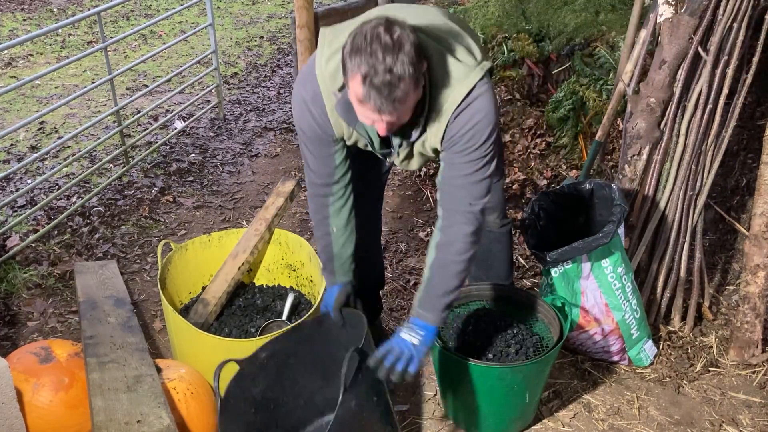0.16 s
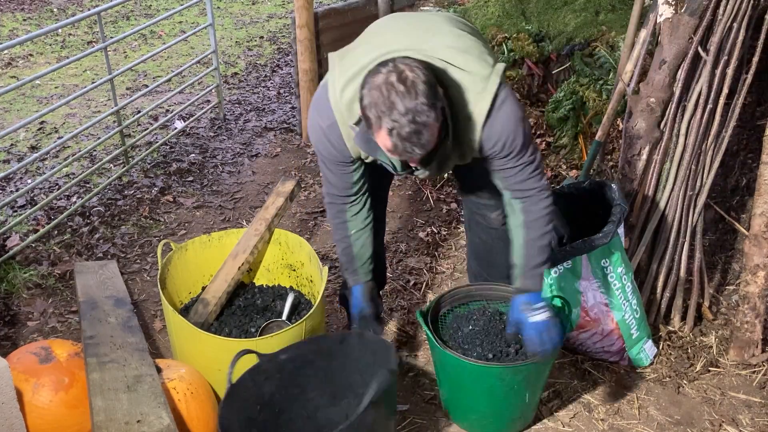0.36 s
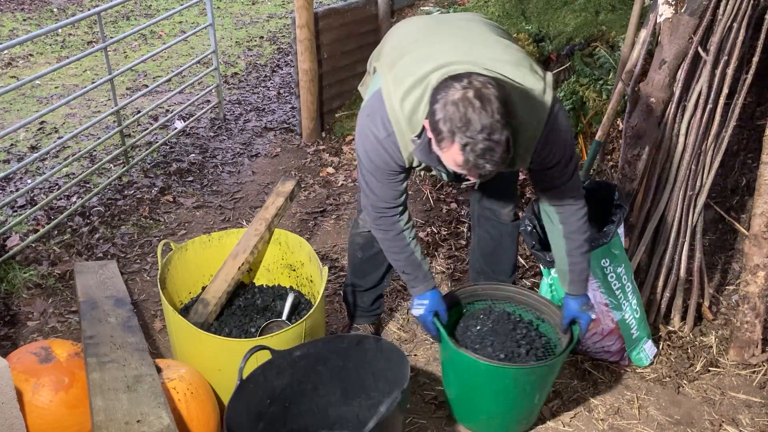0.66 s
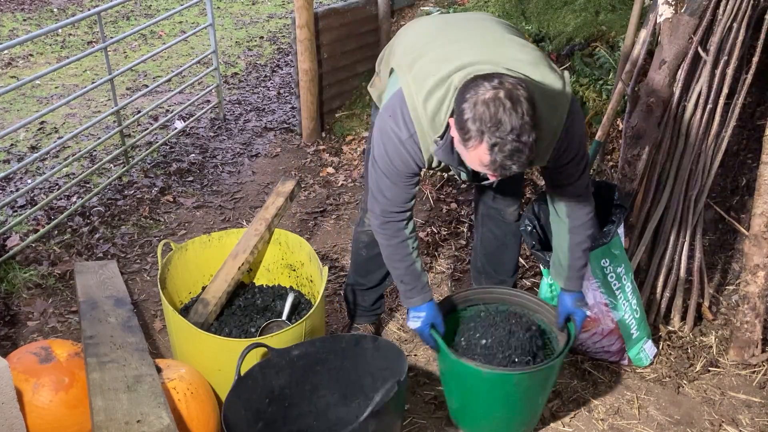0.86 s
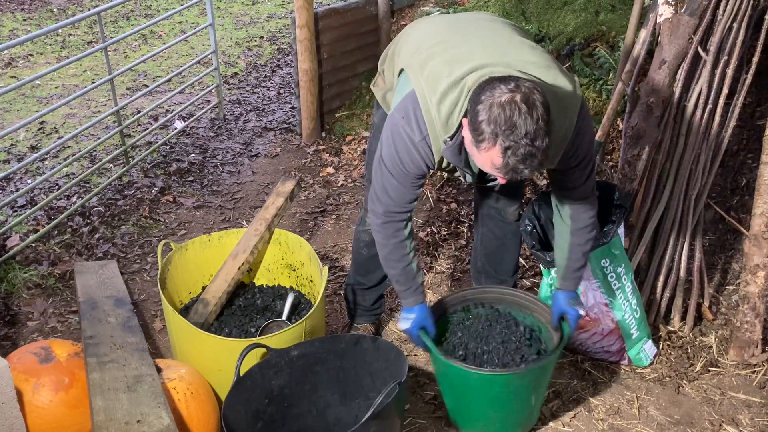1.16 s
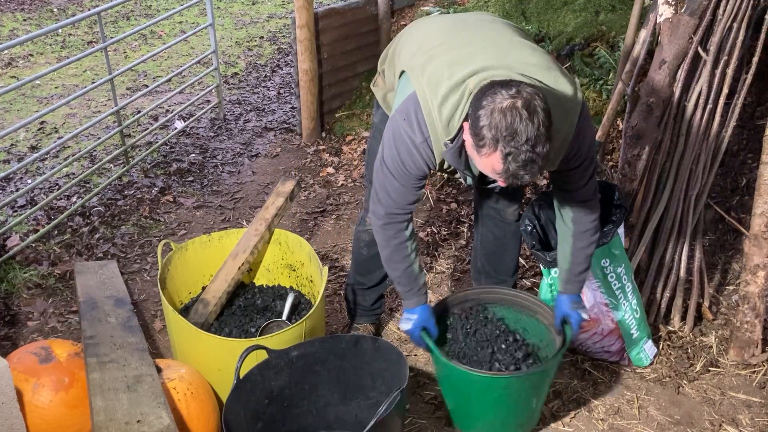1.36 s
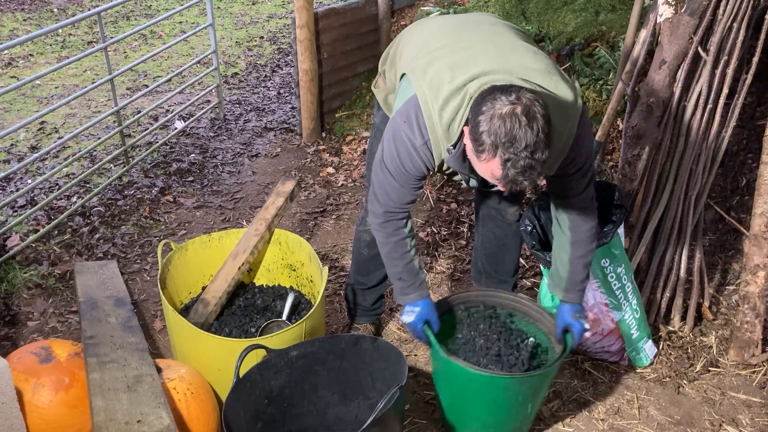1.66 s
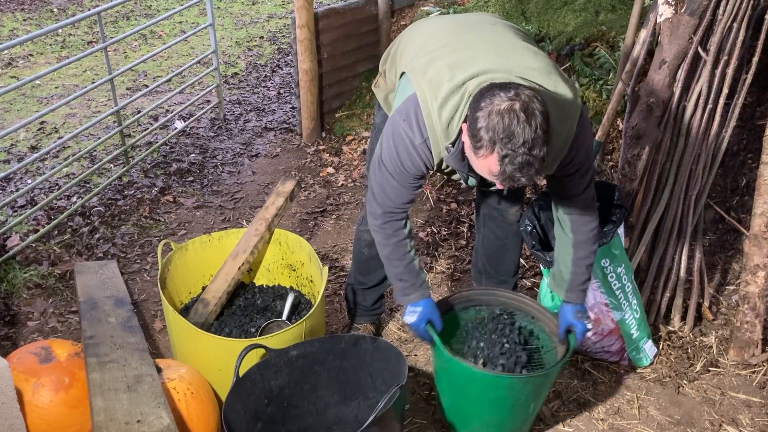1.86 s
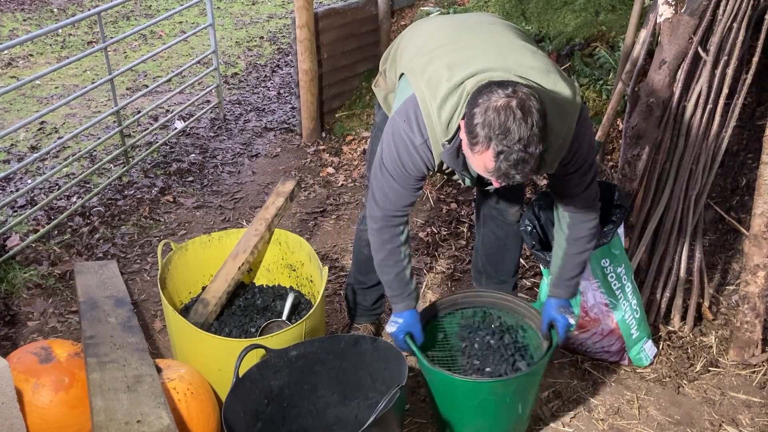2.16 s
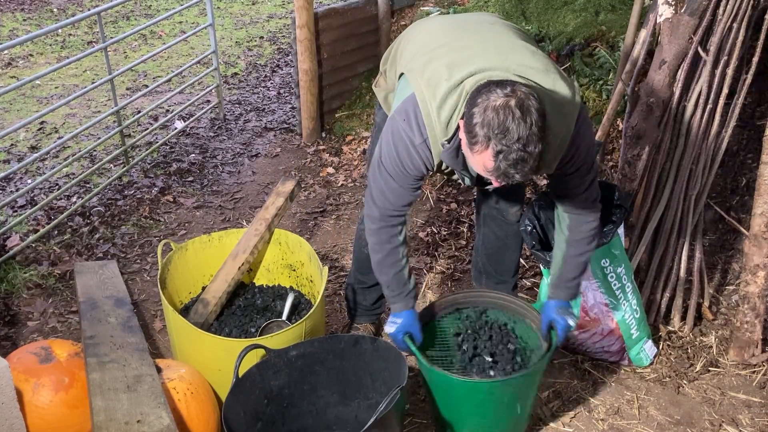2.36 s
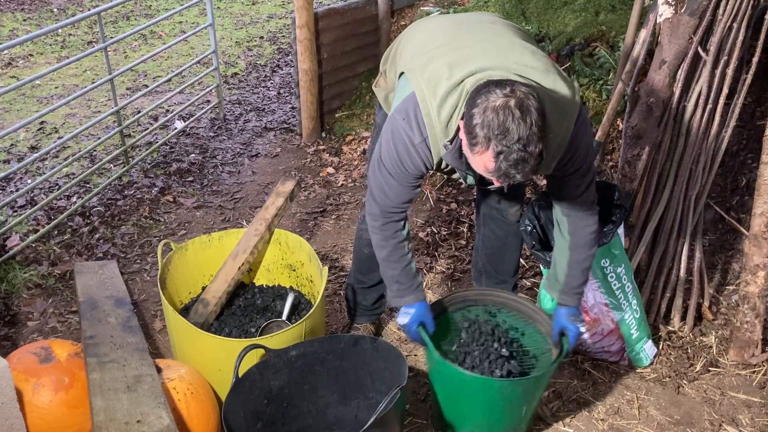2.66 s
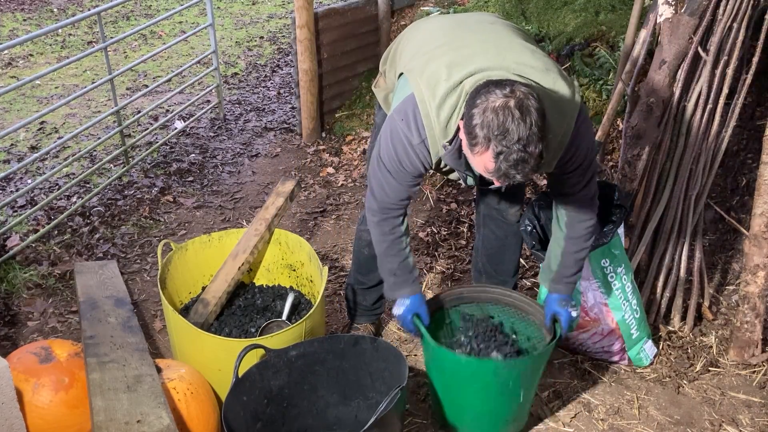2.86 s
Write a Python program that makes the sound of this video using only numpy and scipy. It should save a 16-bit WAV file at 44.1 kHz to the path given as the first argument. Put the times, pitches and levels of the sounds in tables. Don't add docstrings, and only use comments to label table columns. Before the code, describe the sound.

Charcoal sieving outdoors, heard close up: first an empty plastic tub cracks down and scuffs to rest, then fast, regular shakes rattle lumps over mesh, thump the bucket and send fines hissing through.

```python
import sys
import numpy as np
from scipy import signal
from scipy.fft import rfft, irfft, next_fast_len
from scipy.io import wavfile
from scipy.ndimage import uniform_filter1d, map_coordinates

SR = 44100
rng = np.random.default_rng(int(sys.argv[2]) if len(sys.argv) > 2 else 0)


def rack_gain(trim_db):
    fader = np.asarray(trim_db, float)
    return 10 ** (fader / 20)


def generate_wav(signal):
    frames = np.transpose(np.atleast_2d(signal))
    scaled = np.clip(frames, -1, 1) * 32767
    pcm = np.round(scaled).astype(np.int16)
    wavfile.write(sys.argv[1], SR, pcm)


N = 132300


def unit(x):
    return x / np.sqrt(np.mean(x ** 2) + 1e-20)


def noise():
    return rng.standard_normal(N)


def filtered(x, response):
    m = next_fast_len(N + SR // 2)
    return irfft(rfft(x, m) * response(np.fft.rfftfreq(m, 1 / SR)), m)[:N]


def coloured(x, points):
    f, v = np.transpose(points)
    return unit(filtered(x, lambda hz: rack_gain(np.interp(np.log(hz + 1), np.log(f + 1), v))))


def wobble(rate):
    return map_coordinates(rng.standard_normal(400), [np.arange(N) * rate / SR])


def swells(rows, axis, rise=0.89, shape=1.4):
    power, t = np.zeros(N), np.arange(N) / SR
    for row in rows:
        centre, length = row[:2]
        near = slice(max(0, int((centre - 2 * length) * SR)), int((centre + 2 * length) * SR))
        u = 2 * (t[near] - centre) / length
        power[near] += rack_gain(2 * row[axis]) * np.exp(-np.abs(np.where(u < 0, u / rise, u)) ** shape)
    return np.sqrt(power)


def grains(count, lo_hz, hi_hz, cycles, spread_db, size):
    u = rng.random((count, 4))
    hz, k = lo_hz + (hi_hz - lo_hz) * u[:, 1:2], np.arange(size)
    gain = rack_gain(-spread_db * np.log(u[:, 2:3] + 1 / 100)) * np.sqrt(hz)
    life = hz * k / SR / (cycles * (.5 + u[:, 3:]))
    wave = gain * np.sin(2 * np.pi * hz * k / SR) * np.sqrt(life) * np.exp(-life)
    places = (u[:, :1] * N).astype(int) + k
    return unit(np.bincount(places.ravel(), wave.ravel(), N + size)[:N])


def ring(s, modes, sag=0):
    attack_s, sag_s = .0003, 0.077
    out, start = np.zeros(N), int(s * SR)
    t = np.arange(min(N - start, int(max(m[2] for m in modes) * SR))) / SR
    bent = t + sag * sag_s * (1 - np.exp(-t / sag_s))
    tone = sum(rack_gain(db - 60 * t / t60) * np.sin(2 * np.pi * hz * bent) for hz, db, t60 in modes)
    out[start:][:len(t)] = (1 - np.exp(-t / attack_s)) * tone
    return out


# (time [s], peak level [dB], bucket note [Hz], thud level [dB])
KNOCKS = [(0.8023, -19, 217, -12), (0.8826, -19.5, 231, -42), (0.9851, -17.5, 246, -17),
          (1.0939, -13, 244, -36), (1.1862, -15.5, 218, -11.5), (1.289, -20.5, 228.4, -48),
          (1.3844, -19.5, 238, -21.5), (1.477, -18, 219.4, -37), (1.603, -21, 212, -14.5),
          (1.6659, -15, 238.3, -27.5), (1.788, -14, 252.3, -15), (1.8591, -19, 228, -30),
          (1.976, -13, 258, -13.5), (2.0682, -18, 230, -34), (2.1779, -12, 257.4, -10),
          (2.261, -16, 242.3, -30), (2.3783, -16, 240.4, -13), (2.465, -15.5, 252, -29),
          (2.5813, -14, 257, -16), (2.664, -16, 227, -23), (2.7788, -13, 237.3, -9),
          (2.8715, -15.5, 253, -43)]
# (time [s], peak level [dB], thud level [dB])
REBOUNDS = [
    (0.9103, -24.5, -34),
    (1.1103, -20.5, -34),
    (1.3009, -18, -14.5),
    (1.4874, -20, -16),
    (1.676, -18, -13),
    (1.871, -22, -22),
    (2.076, -13.5, -31),
    (2.477, -15.5, -29),
    (2.8837, -21.5, -17),
]
# (multiple of its note, level [dB], t60 [s])
BUCKET_MODES = [(1, 0, 0.1), (2.3, -6.5, 0.017), (2.9, -18, 0.15), (3.5, -31, 0.056)]
# (frequency [Hz], density [dB per Hz])
CHATTER = [(60, -48), (150, 8.5), (245, 3.5), (300, 2.5), (380, -67), (2500, -97)]
# (frequency [Hz], density [dB per Hz])
RIM_SLAP = [(250, -12), (550, 2), (1100, -8), (1800, -29.5), (4000, -53)]


def bucket():
    hits = KNOCKS + [(s, db, 238, thud_db) for s, db, thud_db in REBOUNDS]
    ringing, blows = np.zeros(N), np.zeros(N)
    vary = rng.standard_normal((len(hits), 2, len(BUCKET_MODES)))
    vary = vary * (np.arange(len(BUCKET_MODES)) > 0)
    for (s, db, note_hz, thud_db), (detune, uneven) in zip(hits, vary):
        modes = [(note_hz * k * (1 + 0.076 * d), db - 1 + level + 0.68 * e, t60)
                 for (k, level, t60), d, e in zip(BUCKET_MODES, detune, uneven)]
        thud = (111, thud_db + 1.5, 0.036)
        ringing += ring(s, modes + [thud])
        blows[int(s * SR)] = rack_gain(db)

    t = np.arange(SR // 4) / SR
    contact_s = .0007
    rap = signal.fftconvolve(blows, rack_gain(-5) * np.hanning(int(contact_s * SR) + 2))[:N]
    slap = signal.fftconvolve(blows, rack_gain(-9.5 - 60 * t / .025))[:N] * coloured(noise(), RIM_SLAP)
    shake = signal.fftconvolve(blows, (1 - np.exp(-t / 0.0062)) * rack_gain(-4 - 60 * t / 0.069))[:N]
    chatter = shake * coloured(noise(), CHATTER)
    return ringing + rap + slap + chatter + stroke_air()


def stroke_air():
    sway_hz, wide_hz, lag_s, uneven = 8.4, 4.6, 0.017, 0.34
    push = np.zeros(N)
    push[[int((r[0] + lag_s) * SR) for r in KNOCKS]] = -1 - uneven * (-1) ** np.arange(len(KNOCKS))
    sway = filtered(push, lambda f: 1j * f / (sway_hz ** 2 - f * f + 1j * f * wide_hz) / (1 + (f / 18) ** 2))
    return rack_gain(-31) * unit(sway)


# (centre [s], length [s], clink level [dB], clunk level [dB])
SLIDES = [(.77, 0.055, -47.5, -66), (.815, 0.021, -34, -28), (.85, 0.0069, -52, -62),
          (.9, 0.064, -35.5, -37), (1.0, 0.058, -35.5, -30.5), (1.055, 0.07, -64, -50),
          (1.127, 0.11, -32, -32), (1.2, 0.014, -33, -31), (1.3, 0.077, -33, -28.5),
          (1.398, 0.061, -35.5, -31), (1.5, 0.041, -30, -27), (1.606, 0.072, -30, -31),
          (1.697, 0.033, -33, -40.5), (1.8, 0.067, -32, -33.5), (1.884, 0.028, -32.5, -34),
          (1.965, 0.14, -34.5, -42), (2.11, 0.038, -29, -35.5), (2.17, 0.077, -37, -35.5),
          (2.285, 0.045, -29, -32), (2.39, 0.05, -29.5, -36.5), (2.492, 0.039, -28, -32),
          (2.596, 0.039, -27.5, -33), (2.69, 0.056, -32, -33), (2.797, 0.044, -31, -31),
          (2.888, 0.034, -31.5, -33), (2.99, 0.051, -35, -35)]
# (time [s], peak level [dB])
SLAMS = [(0.8063, -34), (0.8338, -21.5), (0.8692, -31), (0.8971, -41), (0.961, -21.5), (1.1969, -20),
         (1.2383, -24), (1.3511, -17), (1.3576, -17), (1.395, -19), (1.4429, -25), (1.4838, -30),
         (1.564, -20), (1.5885, -31), (1.6893, -29), (1.7497, -20), (1.7721, -28.5), (1.856, -19),
         (1.8784, -24), (1.947, -22.5), (2.0764, -15), (2.1637, -18), (2.2435, -33), (2.2565, -26.5),
         (2.2735, -27), (2.3593, -18.5), (2.4568, -19.5), (2.4825, -26), (2.5399, -21), (2.5693, -15),
         (2.6626, -39), (2.6811, -22), (2.6816, -15), (2.855, -18), (2.8821, -22), (2.971, -36)]
# (time [s], level [dB])
TRICKLE = [
    (.72, -71),
    (.82, -55),
    (1.1, -38),
    (1.7, -43.5),
    (2.3, -39.5),
    (3, -40),
]
# (frequency [Hz], density [dB per Hz])
CLINK = [(760, -2.5), (1550, 3.5), (1930, -2.5), (4510, 3), (7290, -4), (8350, -12), (13200, -14.5),
         (14000, -22), (15800, -21)]
# (frequency [Hz], density [dB per Hz])
CLUNK = [(120, 2), (220, 21.5), (330, 8), (409, 1.5), (653, 7.5), (883, 6), (1120, -7.5), (1550, -14.5),
         (1910, -7), (2200, -7), (2860, -104)]
# (frequency [Hz], width [Hz], lift [dB])
MESH = [(2547, 35, 6.5), (4300, 65, 6), (10500, 1630, 6.5), (12850, 510, 7)]


def mesh_lift(f):
    return 1 + sum((rack_gain(db) - 1) * 1j * f * w / (c * c - f * f + 1j * f * w) for c, w, db in MESH)


def charcoal():
    t = np.arange(N) / SR
    lumps = grains(28000, 1200, 16000, cycles=4, spread_db=2, size=140) + .6 * noise()
    clink = coloured(filtered(lumps, mesh_lift), CLINK)
    clunk = coloured(grains(3500, 330, 1800, cycles=2.2, spread_db=2.5, size=500) + .6 * noise(), CLUNK)
    fines = coloured(grains(16000, 1200, 16000, cycles=3.5, spread_db=2, size=120) + .6 * noise(), CLINK)

    s, db = np.transpose(TRICKLE)
    flow = rack_gain(np.interp(t, s, db))
    jostle = rack_gain(1.1 * wobble(50))
    rise_s, slam_db, slam_t60 = .0015, -11, 0.071
    slam_power = sum(np.clip((t - s) / rise_s, 0, 1) * rack_gain(2 * (db + slam_db - 60 * np.abs(t - s) / slam_t60))
                     for s, db in SLAMS)
    slide_power = swells(SLIDES, axis=2, rise=0.83, shape=2.13) ** 2 * rack_gain(-1.5)
    clink_gain = np.sqrt(slide_power + slam_power)
    clunk_gain = swells(SLIDES, axis=3, rise=0.52, shape=1.39) + 0.44 * flow
    return jostle * (clink_gain * clink + clunk_gain * clunk) + flow * fines


# (centre [s], length [s], frequency [Hz], level [dB])
RATTLES = [
    (1, .05, 747, -36.5),
    (1.009, 0.06, 1630, -38.5),
    (1.05, .08, 830, -44),
    (1.093, 0.061, 830, -35),
    (1.157, 0.049, 880, -39),
]


def rattle():
    width = .22
    knocks = grains(6000, 500, 2000, cycles=1.5, spread_db=2, size=200)

    def band(c):
        return unit(filtered(knocks, lambda f: (1j * f * c / (c * c - f * f + 1j * f * c * width)) ** 2))

    return sum(swells([r], axis=3) * band(r[2]) for r in RATTLES)


# (frequency [Hz], level [dB], t60 [s])
TUB_MODES = [(48.3, -2.5, 0.84), (99.4, -11, 0.96), (155.3, -2.5, 0.37), (200, -13.5, 0.66),
             (248.3, -14, 1), (464, -10, 0.076), (715, -33, .08), (850, -14, 0.17), (1025, -11.5, 0.082)]


def tub_drop():
    t = np.arange(N) / SR
    drop_s, grip_hz = .1838, 130
    low = ring(drop_s, [m for m in TUB_MODES if m[0] <= grip_hz], sag=0.087)
    wall = ring(drop_s, [m for m in TUB_MODES if m[0] > grip_hz], sag=0.087)
    grip = rack_gain(-60 * np.clip(t - .315, 0, None) / .05)
    waver = rack_gain(2.5 * wobble(40.3))
    settling = rack_gain(-15 - 60 * np.clip(t - .42, 0, None) / .07)
    boom = (low + grip * waver * wall) * settling

    slap = coloured(noise(), [(200, 13), (800, 12.0), (2200, -0.5), (5000, -28), (15800, -39)])
    snap = coloured(noise(), [(1500, -17), (3000, -1), (6000, -6), (11000, -13), (15800, -30)])
    since = np.abs(t - drop_s)
    crack = (t > drop_s) * (rack_gain(-18.5 - 60 * since / 0.059) * slap + rack_gain(-26.5 - 60 * since / 0.017) * snap)
    return boom + crack


# (time [s], peak level [dB], note [Hz])
TAPS = [(0.232, -25, 870), (0.293, -38, 720), (0.332, -35, 420), (0.343, -24, 584), (0.353, -22, 628),
        (0.413, -16, 533), (0.466, -28, 890), (0.478, -16, 657), (0.529, -34, 694), (0.544, -20.5, 554),
        (0.599, -31, 536), (0.699, -32, 533), (0.743, -19.5, 472)]
# (multiple of its note, level [dB], t60 [s])
TAP_MODES = [(1, -9.5, 0.04), (1.45, -11, 0.032), (2.2, -16.5, 0.018), (.6, -26.5, 0.071)]
# (time [s], modes (frequency [Hz], level [dB], t60 [s]))
BUMPS = [
    (0.001, [(225, -28.5, 0.2)]),
    (0.4102, [(61.4, -21, 0.064), (169, -33.5, 0.13)]),
    (0.745, [(190, -34, 0.061)]),
]


def taps():
    hard = sum(ring(s, [(hz * k, db + level, t60) for k, level, t60 in TAP_MODES]) for s, db, hz in TAPS)
    return hard + sum(ring(s, modes) for s, modes in BUMPS)


# (centre [s], length [s], scuff level [dB], grit level [dB])
SCUFFS = [(0, 0.046, -40, -67), (.231, 0.034, -34.5, -57.5), (.27, 0.11, -54, -78), (.354, 0.019, -26, -51),
          (.366, 0.056, -32.5, -57.5), (.411, 0.028, -27.5, -55), (.466, 0.035, -32, -75),
          (.543, 0.1, -43.5, -65.5), (.598, 0.033, -41.5, -61), (.335, 0.069, -43.5, -67),
          (.699, 0.014, -36, -70), (.743, 0.032, -35.5, -66), (.125, 0.044, -49, -75)]
# (time [s], peak level [dB])
TICKS = [(.22, -42), (.233, -48), (0.2578, -41), (0.354, -44), (.478, -46), (.588, -40), (.605, -38),
         (0.272, -44), (0.5593, -38), (0.5966, -45)]
# (frequency [Hz], density [dB per Hz])
SCUFF = [(60, -13), (200, 5.5), (325, -2.5), (420, 1), (800, -2.5), (1440, -14.5), (2470, -30.5),
         (6600, -120)]
# (frequency [Hz], density [dB per Hz])
GRIT = [(1500, -42), (2500, 5), (5000, 4.5), (9000, -8), (15800, -9)]
# (centre [s], length [s], level [dB])
FADING = [
    (.02, .08, -41.5),
]


def scuffs():
    t = np.arange(N) / SR
    scuff = coloured(grains(5000, 150, 2500, cycles=1.8, spread_db=2, size=400) + .5 * noise(), SCUFF)
    grit = coloured(grains(6000, 1500, 16000, cycles=1.2, spread_db=3, size=60) + .6 * noise(), GRIT)
    flicks = sum((t > s) * rack_gain(db - 8 - 60 * np.abs(t - s) / .008) for s, db in TICKS)
    ticks = flicks * coloured(noise(), GRIT)
    rub = swells(SCUFFS, axis=2, rise=.12, shape=1.3) * scuff
    crunch = swells(SCUFFS, axis=3, rise=.2, shape=1.3) * grit
    rumble = swells(FADING, axis=2, shape=7.0) * coloured(noise(), CHATTER)
    return rub + crunch + ticks + rumble


# (frequency [Hz], density [dB per Hz])
AIR = [(12, -21), (20, 16), (41, 5), (172, -19), (554, -26.5), (1690, -41), (2120, -45), (2880, -50.5),
       (15800, -47)]


def outdoor_air():
    return rack_gain(-37.5 + 1.1 * wobble(5.8)) * coloured(noise(), AIR)


def scene():
    sieving = bucket() + charcoal() + rattle()
    return (sieving + tub_drop() + taps() + scuffs() + outdoor_air())[None]


def band_limit(x):
    return signal.sosfilt(signal.butter(12, 16010, fs=SR, output="sos"), x)


# (from [Hz], to [Hz], rarity)
STARVED = [
    (13900, 14500, .1),
    (14500, 15200, .6),
    (15200, 15900, .4),
]


def record(dry):
    limit, knee = .27, 6
    soft = dry[0] / (1 + np.abs(dry[0] / limit) ** knee) ** (1 / knee)
    out = filtered(soft, lambda hz: (hz < 15830) * (hz > 4) * rack_gain(-3 * (hz > 13900)))
    busy_s, drops_per_s = 1.25, 11
    busy, strain = np.arange(N) > busy_s * SR, wobble(drops_per_s)
    for lo_hz, hi_hz, rarity in STARVED:
        off = busy * (strain + wobble(drops_per_s) / 2 > rarity)
        fade = uniform_filter1d(uniform_filter1d(off * 1.0, size=300), size=300)
        out = out - fade * filtered(out, lambda hz: (hz > lo_hz) * (hz <= hi_hz))
    return band_limit(out[None])


dry = scene()
out = record(dry)
generate_wav(out)
```